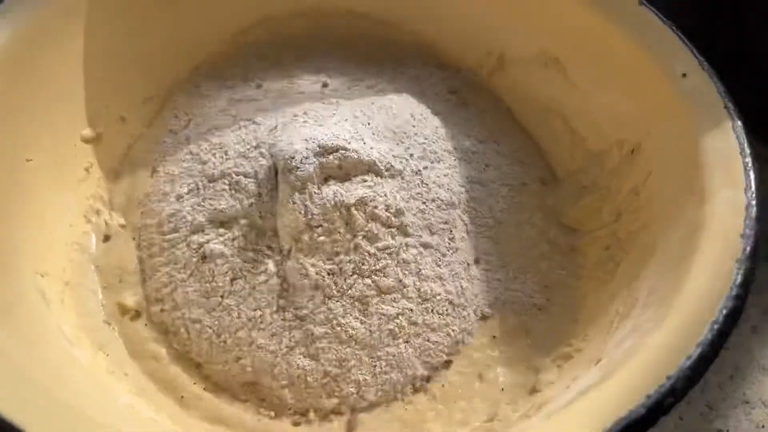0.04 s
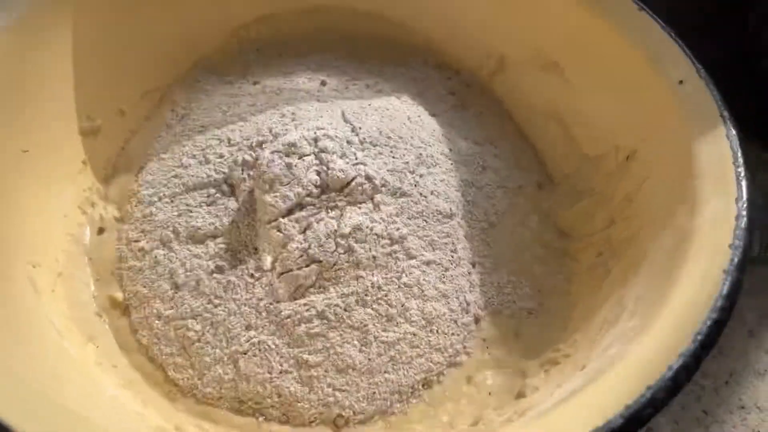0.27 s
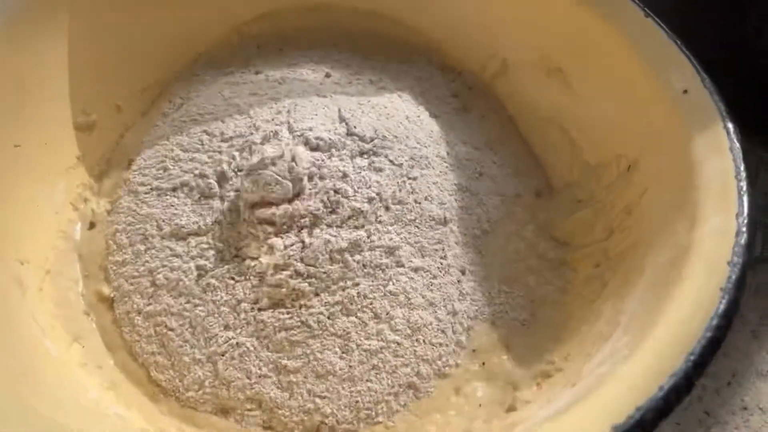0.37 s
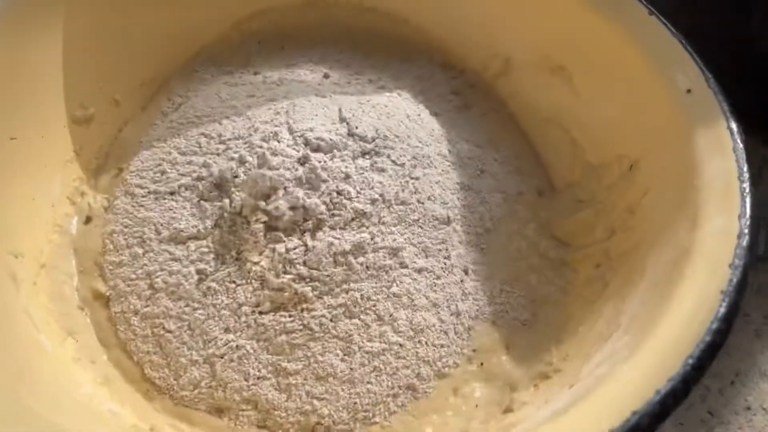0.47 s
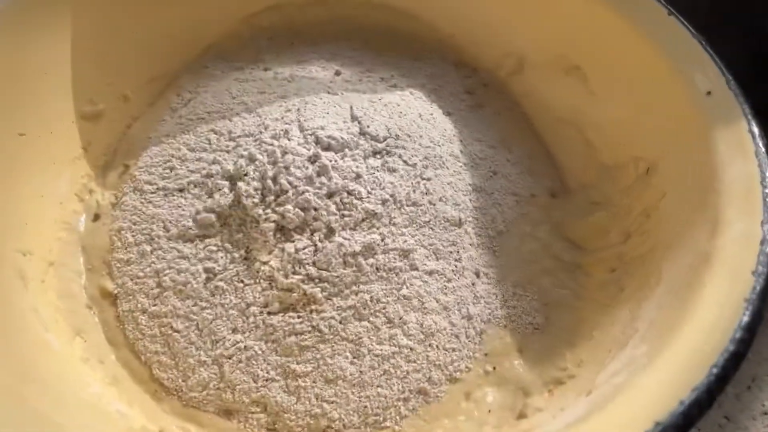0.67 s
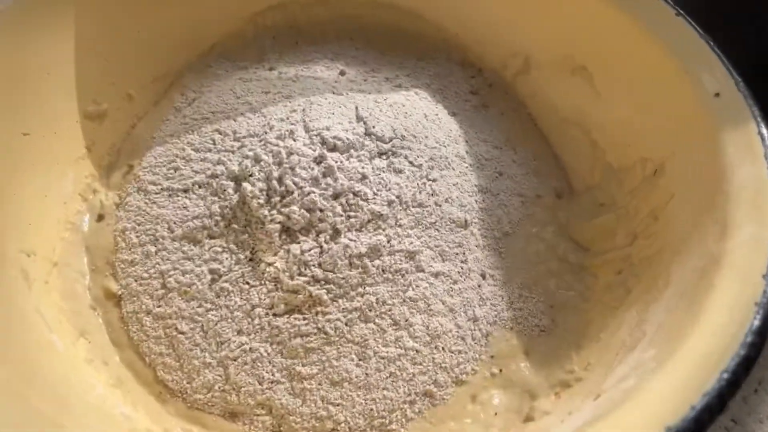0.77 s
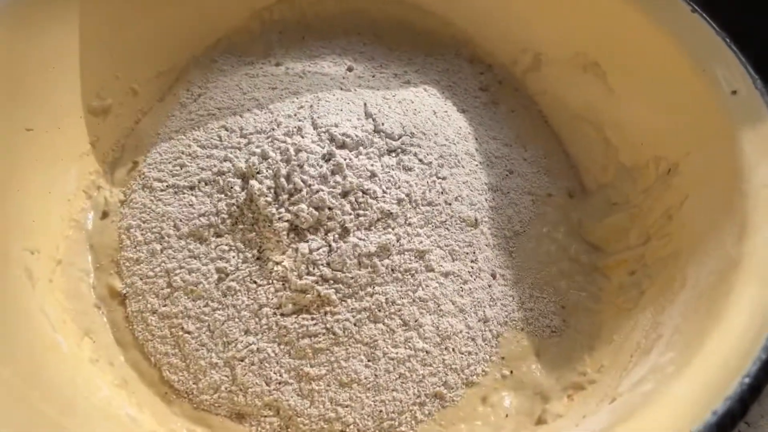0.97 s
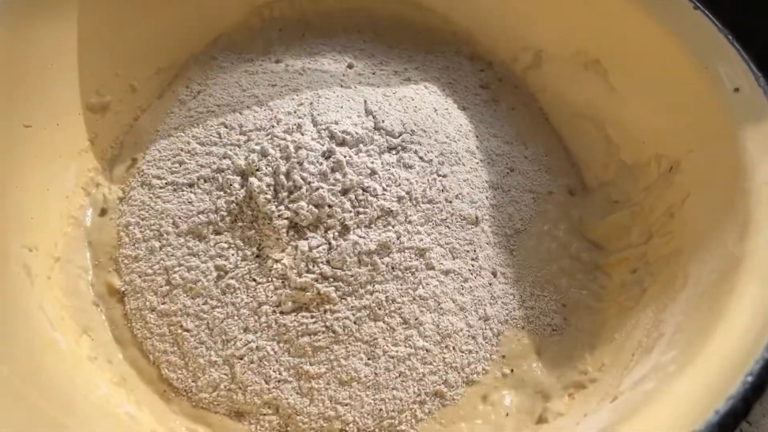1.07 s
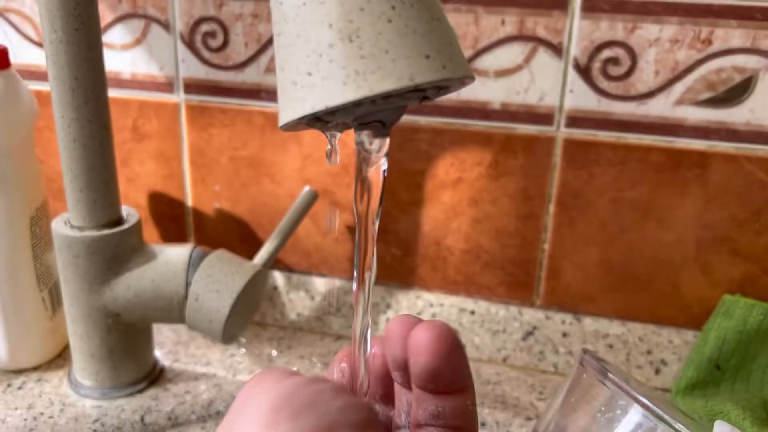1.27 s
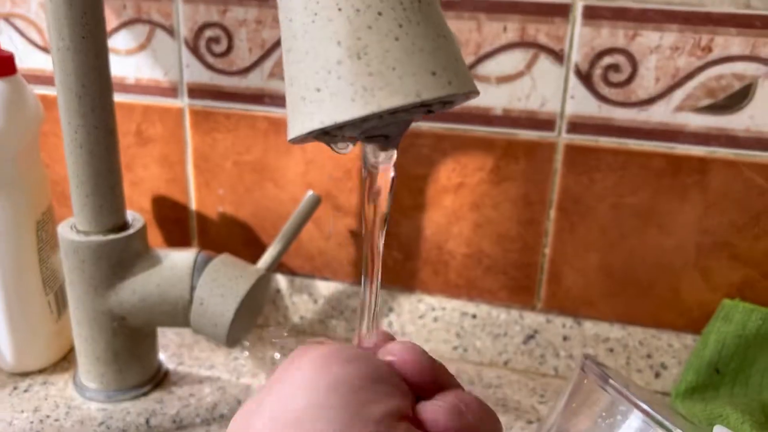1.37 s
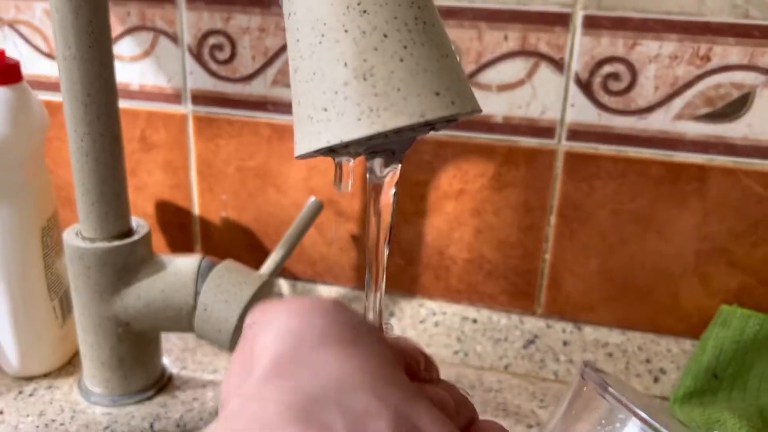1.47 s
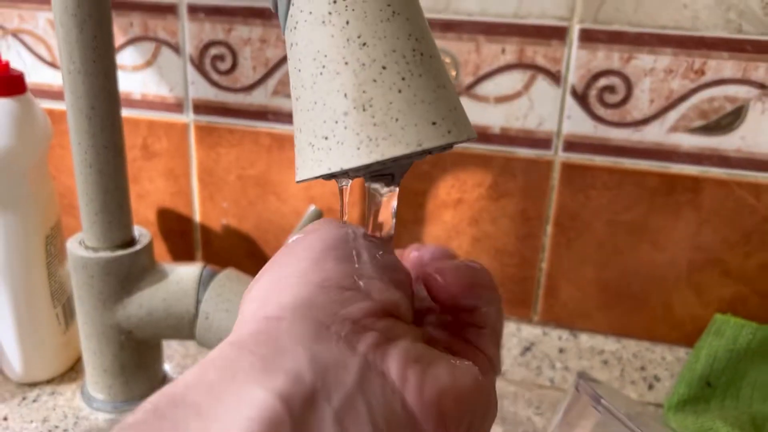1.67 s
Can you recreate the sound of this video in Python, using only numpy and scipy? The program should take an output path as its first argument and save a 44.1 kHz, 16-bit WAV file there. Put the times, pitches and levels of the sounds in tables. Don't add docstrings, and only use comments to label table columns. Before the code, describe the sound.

A hand rustles faintly, then an enamel bowl thuds hard on a counter with quick weakening bounces and short room echo; after near quiet, a cut to a thin tap stream spattering on a hand, close stereo phone microphone.

```python
import sys
import numpy as np
from scipy import signal
from scipy.fft import rfft, irfft, next_fast_len
from scipy.io import wavfile
from scipy.ndimage import uniform_filter1d, map_coordinates

SR = 44100
rng = np.random.default_rng(int(sys.argv[2]) if len(sys.argv) > 2 else 0)


def invert_db(x):
    u = np.asarray(x, float) / 20
    return 10 ** u


def dump_mix(stems):
    frames = np.atleast_2d(stems).T
    limited = np.clip(frames, -1, 1)
    pcm = np.round(limited * 32767).astype(np.int16)
    wavfile.write(sys.argv[1], SR, pcm)


N = 74970

# hz, density_db (per Hz)
ROOM_TONE_COLOUR = [(15, -65), (25, -37.5), (45, -17.5), (70, -14), (92, -16.5), (179, -19.5), (329, -26),
                    (369, -30.5), (600, -43.5), (2000, -53), (2400, -120)]
# hz, density_db (per Hz)
HISS_COLOUR = [(500, -20), (2000, -3), (5000, 0), (6300, -6), (8000, -10), (10300, -6), (12000, -9),
               (16000, -16)]
# hz, t60_s
KITCHEN_DECAY = [(60, .7), (250, .46), (600, .44), (1000, .48), (2000, .47), (4000, .6), (7000, .45),
                 (12000, .27)]
# hz, level_db
KITCHEN_COLOUR = [(60, -27.5), (250, -10), (700, -4), (1500, -2), (2500, 0), (8000, -10.5)]
# start_s, level_db
HAND_MOVES = [(0.0, -60), (0.008, -52.5), (0.048, -56.5), (0.088, -48), (0.148, -59.5), (0.162, -54.5),
              (0.202, -60.5), (0.213, -51.5)]
# hz, density_db (per Hz)
SKIN_COLOUR = [(180, -45), (300, -5.5), (624, -8), (2480, -18.5), (8360, -14.5), (10200, -18), (12100, -13),
               (13500, -30.5), (16000, -12)]
# start_s, level_db
SLEEVE_MOVES = [(.4, -84), (.47, -80), (.52, -77), (.6, -92), (.9, -96), (.99, -78), (1.035, -68),
                (1.07, -74), (1.13, -92), (1.22, -102)]
# hz, density_db (per Hz)
SLEEVE_COLOUR = [(2000, -40), (3500, -3), (6000, 0), (9000, -4), (12000, -3), (16000, -2)]
# start_s, peak_db, pitch_hz
HAND_TICKS = [
    (.272, -35, 7000),
    (.481, -62, 6600),
    (.482, -68, 15000),
    (.368, -56, 6500),
    (.521, -61, 7000),
    (.968, -56, 9000),
    (1.045, -59, 800),
    (.026, -45, 8000),
    (.19, -48, 9000),
]
# start_s, level_db
STREAM_FLOW = [(1.22, -3), (1.27, -1), (1.288, -7), (1.32, -0.5), (1.355, -0.5), (1.385, -3), (1.42, 2),
               (1.49, 0), (1.51, -4.5), (1.58, -0.5), (1.62, -3), (1.65, 2.5), (1.7, -2.5)]
# hz, density_db (per Hz)
SPRAY_COLOUR = [(240, -59), (400, -15.5), (1290, -22), (1630, -15), (3420, -19.5), (4580, -16.5),
                (8900, -13), (10400, -17), (16000, -16)]
# hz, likeness (0-1)
SPRAY_LIKENESS = [(60, 0.65), (240, 1), (950, 0.39), (3770, 0.48), (15000, 0.25)]
# start_s, peak_db, centre_hz, spread_octaves, t60_s
WATER_DROPS = [(1.2293, -41.5, 8200, .12, 0.011), (1.2335, -46, 2260, 0.049, .12),
               (1.248, -43, 11770, .06, .04), (1.2642, -40, 8750, 0.18, .03),
               (1.2738, -58, 7120, 0.27, 0.01), (1.2975, -45, 6060, .25, 0.0079),
               (1.3065, -41, 5650, .12, 0.013), (1.316, -46.5, 2460, 0.13, 0.088),
               (1.3235, -32.5, 6030, 0.3, 0.022), (1.3325, -27, 6640, 0.36, 0.026),
               (1.3398, -31, 8020, 0.19, 0.052), (1.378, -49, 4670, 0.078, 0.034),
               (1.397, -44.5, 1800, .4, 0.019), (1.4168, -32.5, 8610, 0.36, .07),
               (1.4428, -35, 5286, .3, .025), (1.4795, -43.5, 6900, .05, .05),
               (1.5187, -46.5, 2870, 0.095, 0.016), (1.5635, -40, 6010, 0.056, 0.023),
               (1.5742, -29, 6350, 0.37, .03), (1.594, -40.5, 8700, .3, 0.053),
               (1.614, -40.5, 9000, 0.081, .03), (1.6362, -26.5, 7470, 0.54, 0.022),
               (1.6548, -40.5, 7530, .3, 0.0433), (1.6605, -23.5, 11460, 0.18, 0.014),
               (1.5565, -49, 750, 0.65, 0.12), (1.6362, -42, 1020, 0.68, 0.065),
               (1.6548, -41.5, 2000, 1.11, 0.025), (1.4428, -36, 2010, 0.23, .03),
               (1.544, -44.5, 2520, 0.31, 0.0091), (1.242, -42.5, 3070, 0.51, 0.017),
               (1.268, -56, 3800, 0.65, 0.014), (1.336, -48, 2900, 0.062, .06),
               (1.452, -46, 2960, 0.22, 0.06), (1.689, -53.5, 994, 0.33, 0.02),
               (1.686, -57, 3460, 0.37, .03), (1.658, -45, 2661, 0.17, 0.032),
               (1.661, -40, 15300, .06, .02), (1.593, -49.5, 3040, 0.22, 0.015)]
# start_s, peak_db, pitch_hz
BUBBLES = [(1.5, -49.5, 1680), (1.388, -50.5, 1520), (1.258, -51.5, 2340), (1.6, -45.5, 15000),
           (1.274, -47.5, 18000), (0.93, -43.5, 12000), (1.7, -43.5, 1800), (0.78, -29, 15300),
           (1.333, -36, 14800), (1.6, -53, 1880), (1.592, -48.5, 13000), (1.472, -41.5, 9300),
           (1.333, -42, 12000), (1.229, -52, 15000), (2, -47, 4400), (1, -47, 2260)]
# start_s, peak_db, pitch_hz, t60_s
AIR_POCKETS = [
    (1.5191, -34, 1780, 0.017),
    (1.5187, -32.5, 2280, 0.02),
    (1.5195, -41, 2630, 0.02),
    (1.64, -49.5, 1020, 0.065),
    (1.663, -55.5, 2100, 0.069),
    (1.5725, -33, 3300, 0.0083),
    (1.5723, -39.5, 4600, 0.017),
    (1.6362, -20.5, 8400, 0.0097),
    (1.6345, -35.5, 5700, 0.017),
    (1.6367, -46, 1650, 0.015),
]
# start_s, strength_db, softness_db (per octave)
BOWL_KNOCKS = [
    (0.2004, -23.5, 3.5),
    (0.2146, 0, 1.5),
    (0.286, -14, 9.5),
    (0.342, -24, 1.5),
    (0.351, -18, 16.5),
    (0.404, -31, 11),
    (0.456, -29.5, 11),
]
# pitch_hz, level_db, t60_s, rise_s
BOWL_MODES = [(83.1, -0.5, 0.14, 0.0197), (127.25, -4, 0.069, 0.0084), (222, -9.5, 0.13, 0.0085),
              (334.2, -2, 0.072, 0.0024), (549.4, 3.5, 0.025, 0.0013), (656.6, -0.5, 0.032, 0.00079),
              (876.8, -13, 0.054, 0.0013), (1059, -10.5, 0.038, 0.00057), (1043, -42, .7, .002),
              (1128.5, -17, 0.057, 0.0011), (1398.5, -18, 0.051, 0.00085), (1620, -23.5, 0.066, 0.00089),
              (1983, -23, 0.045, 0.0024), (2350, -33, 0.045, 0.0023)]
# hz, level_db
CRACK_COLOUR = [(500, -14.5), (2500, 4), (6500, -2.5), (9000, 1), (12000, -4), (16000, -6)]
# centre_hz, width_hz, depth (0-1)
PORT_NOTCHES = [(10300, 800, .94), (13800, 1200, .96)]

CUT_S, FADE_S, RISE_S = 1.222, .015, .045


def unit(x):
    return x / np.sqrt(np.mean(x ** 2) + 1e-20)


def along(points, hz):
    f, value = np.transpose(points)
    return np.interp(np.log(hz + 1), np.log(f + 1), value)


def level(rows):
    s, db = np.transpose(rows)
    before_db = db[0] - 60 * (s[0] > .1)
    return invert_db(np.interp(np.arange(N) / SR, s, db, left=before_db, right=-140))


def wobble(rate):
    knots = rng.standard_normal(int(N * rate / SR) + 4)
    return map_coordinates(knots, [np.arange(N) * rate / SR])


def filtered(x, response):
    m = next_fast_len(N + SR // 2)
    return irfft(rfft(x, m) * response(np.fft.rfftfreq(m, 1 / SR)), m)[..., :N]


def rush(spectrum, alike, patchy_db):
    z = signal.stft(rng.standard_normal((2, N)), nperseg=256)[2]
    field = uniform_filter1d(rng.standard_normal(z.shape[1:]), size=5, axis=0)
    field = uniform_filter1d(field, size=6, axis=1)
    pair = signal.istft(z * invert_db(patchy_db * unit(field)), nperseg=256)[1][:, :N]

    def mid_side(hz):
        angle = np.arccos(np.clip(along(alike, hz), -1, 1)) / 2
        return invert_db(along(spectrum, hz)) * [np.cos(angle), np.sin(angle)]

    mid, side = filtered(pair, mid_side)
    return unit(np.array([mid + side, mid - side]))


def room(x, t60s, gap_s):
    hz, t, z = signal.stft(rng.standard_normal((2, SR * 3 // 4)), SR, nperseg=256)
    decay = invert_db(-60 * t / along(t60s, hz)[:, None])
    tail = signal.istft(z * decay, SR, nperseg=256)[1]
    late = np.pad(x, (round(gap_s * SR), 0))
    return signal.fftconvolve(late[None], tail / np.linalg.norm(tail[0]), axes=1)[:, :N]


def splat(start_s, peak_db, hz, octaves, t60):
    size, click, skirt_db = 4096, 4, -27
    own = .3
    t, out = np.arange(size) / SR, np.zeros((2, N + SR))
    noise = rng.standard_normal((3, size))
    ragged = invert_db(2.5 * np.repeat(rng.standard_normal(128), repeats=32))
    push = (noise[0] + own * noise[1:]) * ragged * invert_db(-60 * t / t60)
    push[:, 0] += click * np.sqrt(np.clip(.3 / octaves, 1, 4))
    f, width = np.fft.rfftfreq(size, 1 / SR), hz * octaves * 2
    resonance = (1j * f * width / (hz * hz - f * f + 1j * f * width)) ** 2
    skirt = invert_db(skirt_db) * 1j * f / (1500 + 1j * f)
    burst = irfft(rfft(push) * (resonance + skirt))
    out[:, round(start_s * SR):][:, :size] = invert_db(peak_db) * burst / abs(burst).max()
    return out[:, :N]


def hiss():
    return invert_db(-83) * rush(HISS_COLOUR, [(1000, .4)], patchy_db=2.0)


def room_tone():
    return invert_db(-59.5 + 3.4 * wobble(13)) * rush(ROOM_TONE_COLOUR, [(60, 0.78), (500, .7), (2000, 0.15)], patchy_db=-2.0)


def hand():
    grit = invert_db(2.0 * wobble(250))
    skin = unit(grit * rush(SKIN_COLOUR, [(300, 0.38), (3000, 1.0), (10000, 0.71)], patchy_db=-1.0))
    rub = skin * level(HAND_MOVES) * invert_db(8)
    ticks = sum(splat(s, db, hz, 0.36, .015) for s, db, hz in HAND_TICKS)
    sleeve = rush(SLEEVE_COLOUR, [(1000, 1.0)], patchy_db=-3.0) * level(SLEEVE_MOVES)
    return rub + ticks + sleeve


def spray():
    gain = level(STREAM_FLOW) * invert_db(-56 + 2.5 * wobble(38))
    return gain * rush(SPRAY_COLOUR, SPRAY_LIKENESS, patchy_db=1.5)


def fizz():
    per_s, spread_db, low_hz = 1000, 1.6, 2800
    length_s = N / SR - CUT_S
    count, t = int(per_s * length_s), np.arange(300) / SR
    when, pitch, size, ring = rng.random((count, 4)).T[..., None]
    hz = low_hz * 4.0 ** pitch
    peak = invert_db(-spread_db * np.log(0.036 + size))
    grains = peak * np.sin(2 * np.pi * hz * t) * np.exp(-t * hz / (0.51 + 3.5 * ring))
    at = ((CUT_S + when * length_s) * SR).astype(int) + np.arange(300)
    out = np.bincount(at.ravel(), grains.ravel(), N + 300)[:N]
    return invert_db(-62) * level(STREAM_FLOW) * out / out[int(CUT_S * SR):].std()


def plinks():
    rise_s = .0008
    out, t = np.zeros(N + SR), np.arange(4096) / SR
    for s, db, hz, t60 in AIR_POCKETS:
        envelope = invert_db(db - 60 * t / t60) * (1 - np.exp(-t / rise_s))
        out[round(s * SR):][:4096] += envelope * np.sin(2 * np.pi * hz * t)
    return out[:N]


def water():
    drops = sum(splat(*row) for row in WATER_DROPS)
    bubbles = sum(splat(s, db, hz, 0.14, .045) for s, db, hz in BUBBLES)
    near = invert_db(1.5) * (drops + bubbles + plinks()) + fizz()
    sink = invert_db(-7) * room(near.mean(0), [(2000, 0.18), (12000, .04)], 0.001)
    return near * invert_db(np.array([[.9], [-.9]])) + sink + spray()


def bowl():
    crack_db, crack_t60, crunch_db, crunch_t60 = -20, .014, -23, 0.66
    out, crack, t = np.zeros(N + SR), np.zeros(N + SR), np.arange(SR // 2) / SR
    fade = invert_db(-60 * t / crack_t60) + invert_db(crunch_db - 60 * t / crunch_t60)
    for s, db, soft in BOWL_KNOCKS:
        at = round(s * SR)
        scatter_db = 5 * (db < -5)
        for hz, mode_db, t60, rise in BOWL_MODES:
            dull_db = soft * np.log2(hz / BOWL_MODES[0][0])
            peak_db = mode_db - dull_db + scatter_db * rng.standard_normal()
            envelope = invert_db(db + peak_db - 60 * t / t60) * (1 - np.exp(-(t / rise) ** 2))
            out[at:][:len(t)] += envelope * np.sin(2 * np.pi * hz * t)
        crack[at:][:len(t)] += invert_db(crack_db + 5.7 * db - 4 * soft) * fade * rng.standard_normal(len(t))
    return out[:N] + filtered(crack[:N], lambda hz: invert_db(along(CRACK_COLOUR, hz)))


def scene():
    t, knock, tone = np.arange(N) / SR, bowl(), room_tone()
    answer = filtered(room(knock, KITCHEN_DECAY, .006), lambda hz: invert_db(along(KITCHEN_COLOUR, hz)))
    tone_before = tone * invert_db(2 * (t < .21))
    first = knock * invert_db(np.array([[.8], [-.8]])) + answer + hand() + tone_before
    thud_db = 3.5 * np.exp(-((t - 1.613) / 0.036) ** 2)
    second = water() + tone * invert_db(-1 + thud_db)
    fade_out = np.clip((CUT_S - t) / FADE_S, 0, 1)
    fade_in = np.clip((t - CUT_S) / RISE_S, 0, 1) ** .5
    return first * fade_out + second * fade_in + hiss()


def roll_off(x):
    return signal.sosfilt(signal.butter(12, 17150, fs=SR, output="sos"), x)


def record(dry):
    top_hz, low_hz, lag_s = 16300, 34, 1.9e-5

    def microphone(hz):
        port = np.prod([1 - d * np.exp(-((hz - c) / w) ** 2 * 2) for c, w, d in PORT_NOTCHES], axis=0)
        lag = np.exp(2j * np.pi * hz * lag_s * np.array([[.5], [-.5]]))
        band = (hz < top_hz) * hz ** 2 / np.sqrt(hz ** 4 + low_hz ** 4)
        return port * lag * band

    mix = filtered(dry, microphone)
    return roll_off(mix)


dry = scene()
out = record(dry)
dump_mix(out)
```